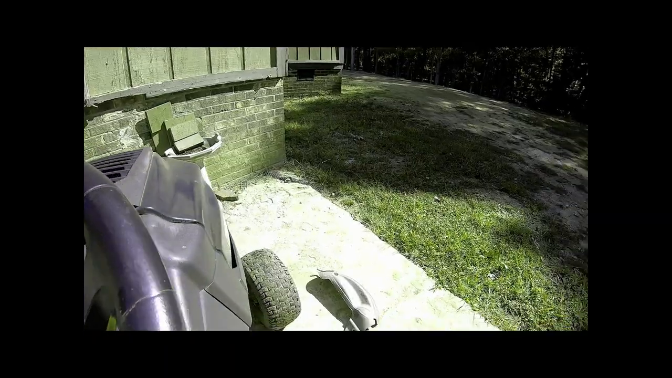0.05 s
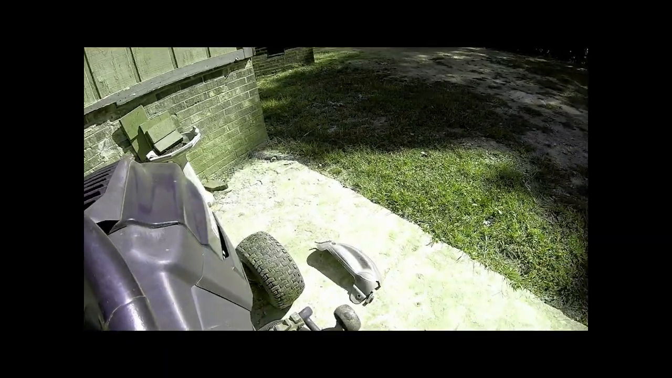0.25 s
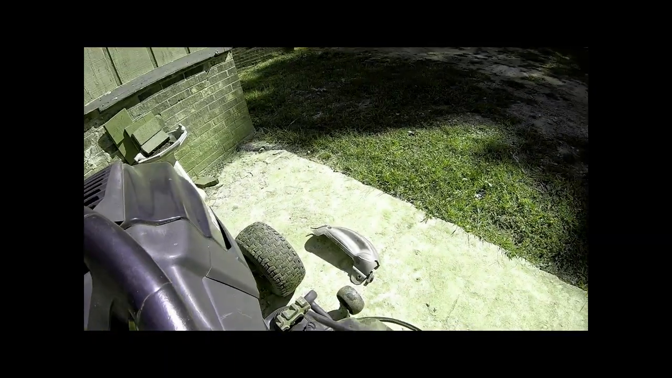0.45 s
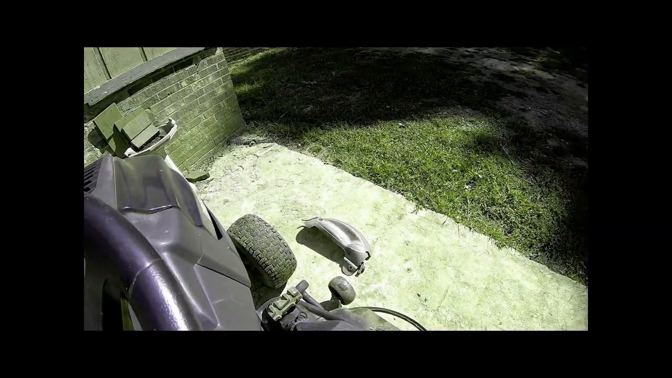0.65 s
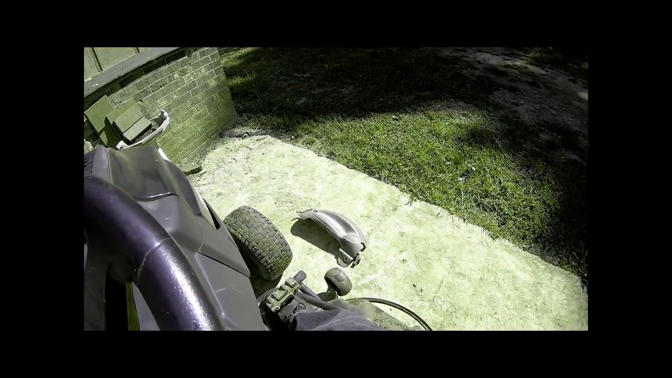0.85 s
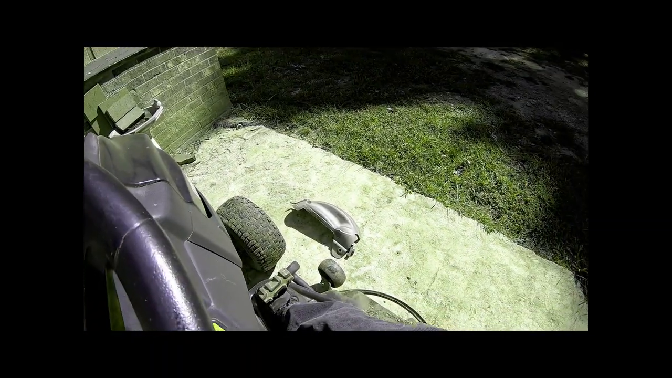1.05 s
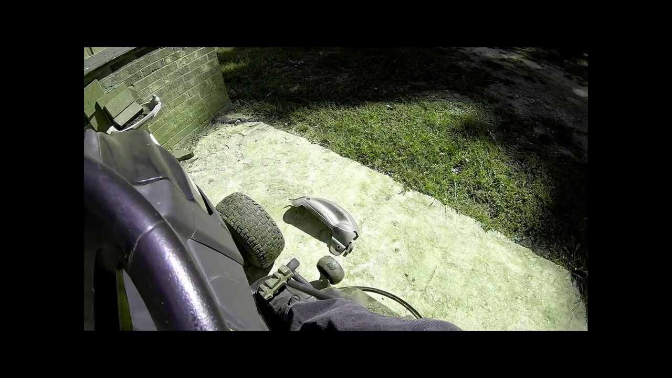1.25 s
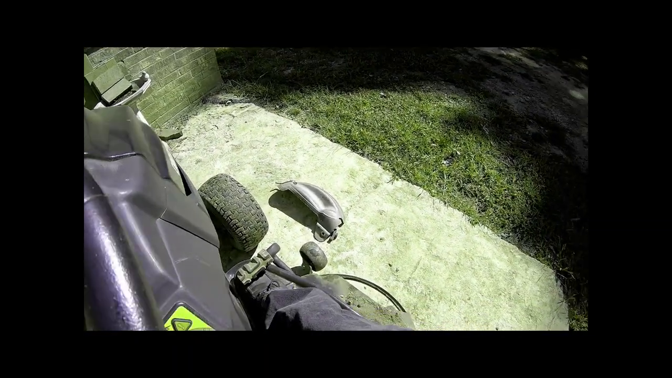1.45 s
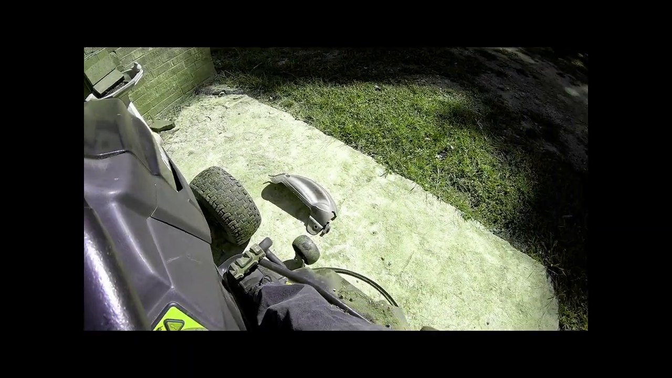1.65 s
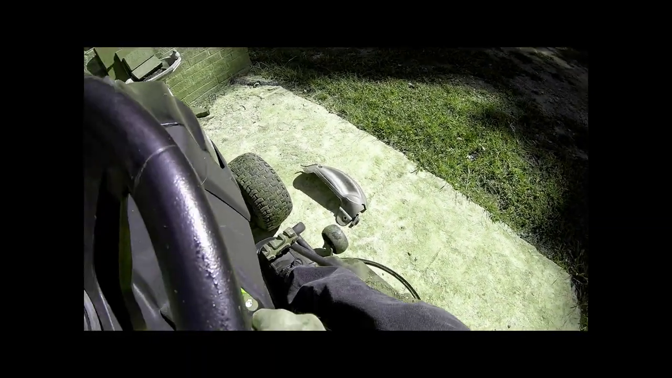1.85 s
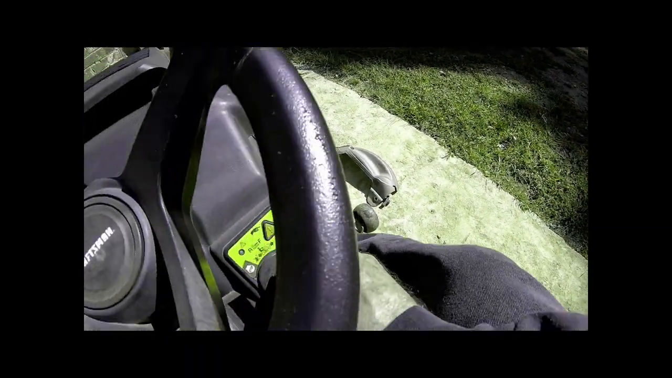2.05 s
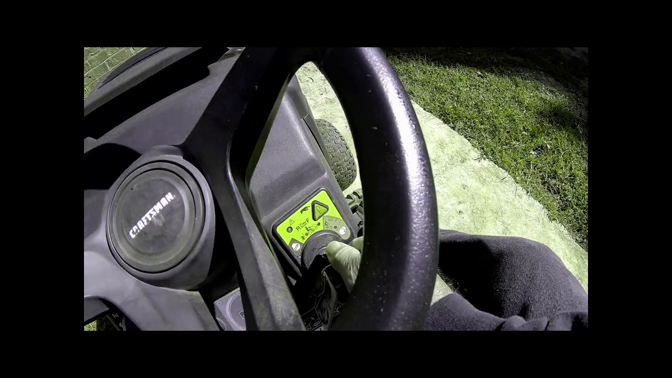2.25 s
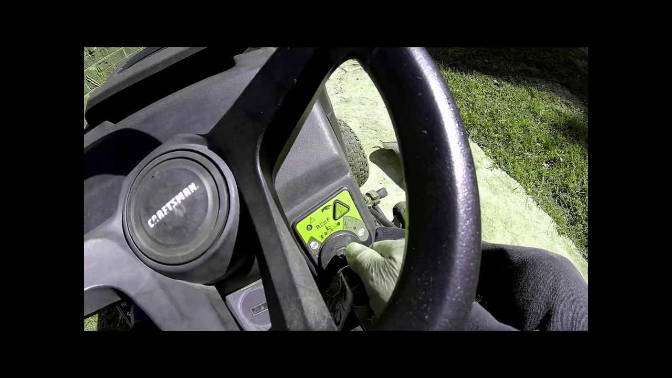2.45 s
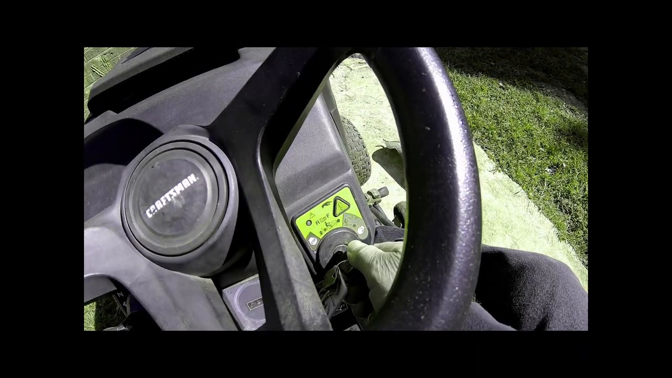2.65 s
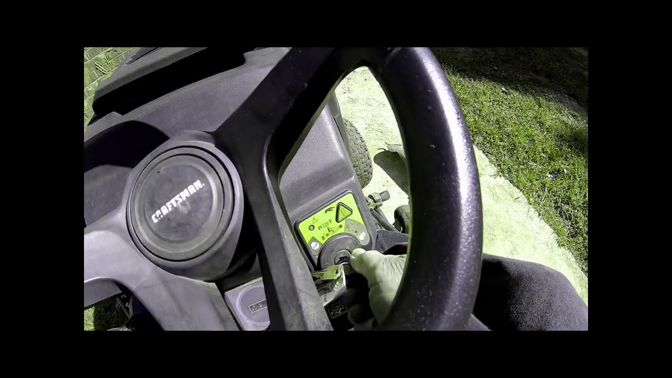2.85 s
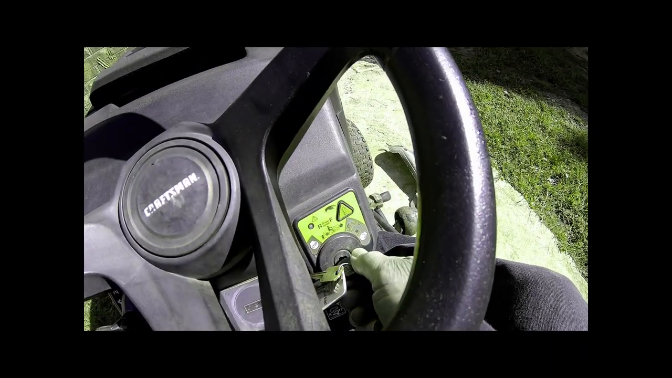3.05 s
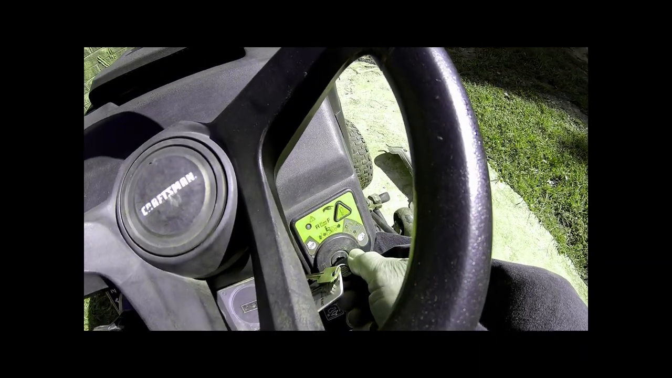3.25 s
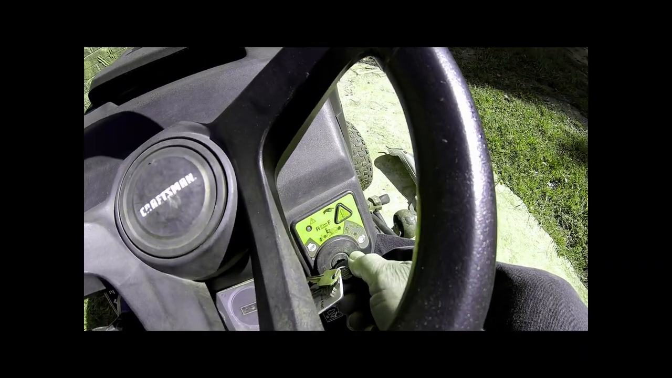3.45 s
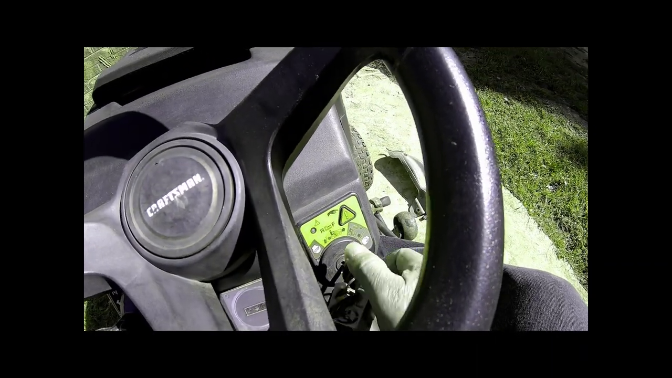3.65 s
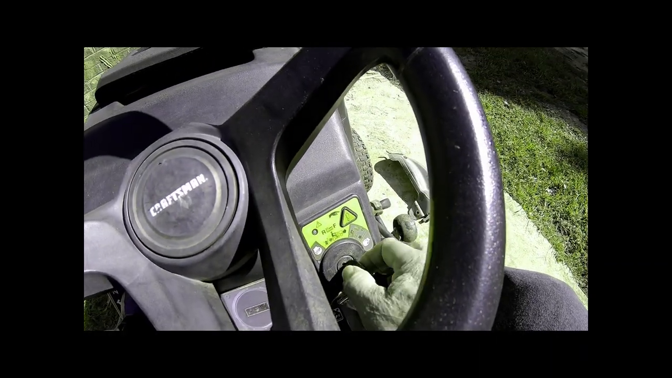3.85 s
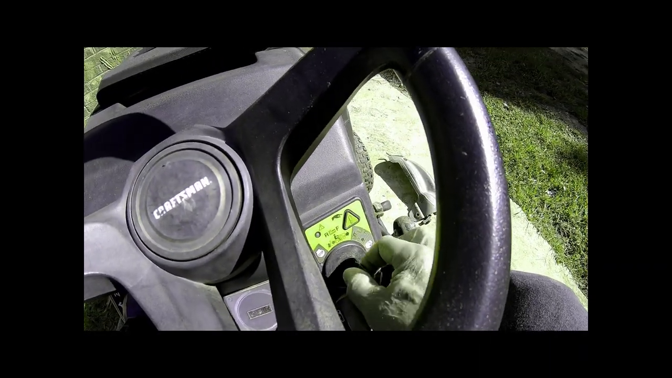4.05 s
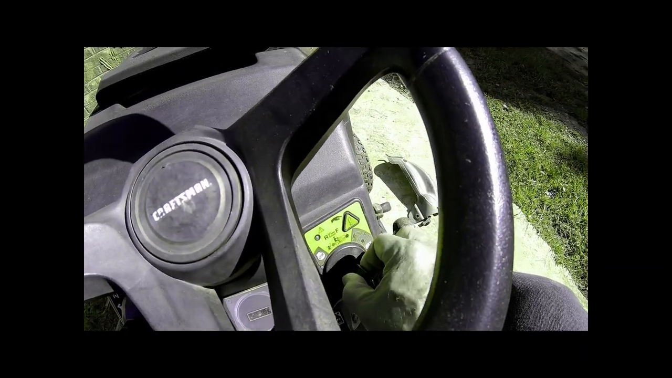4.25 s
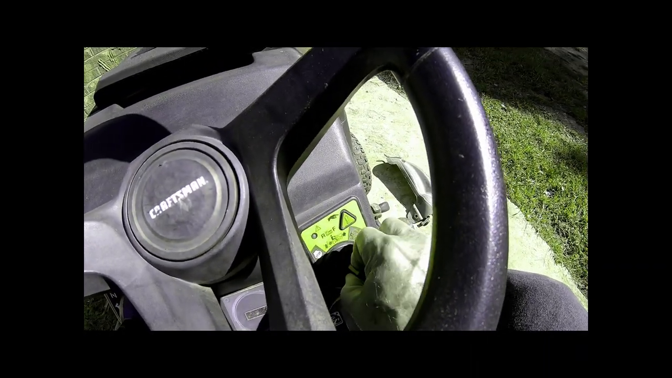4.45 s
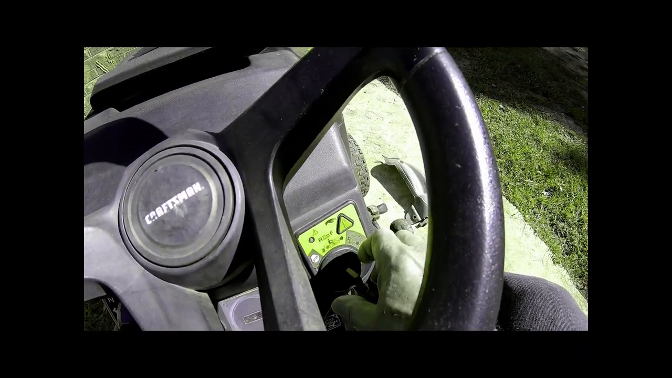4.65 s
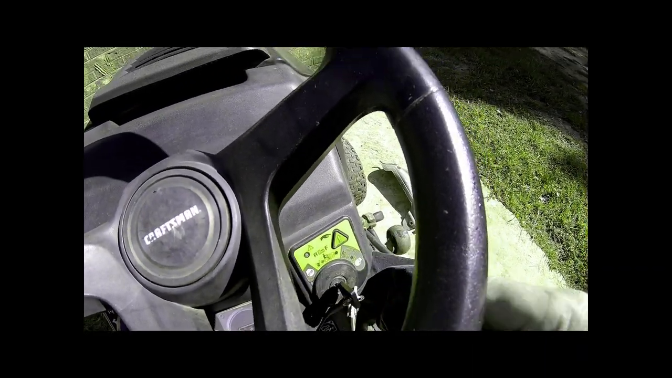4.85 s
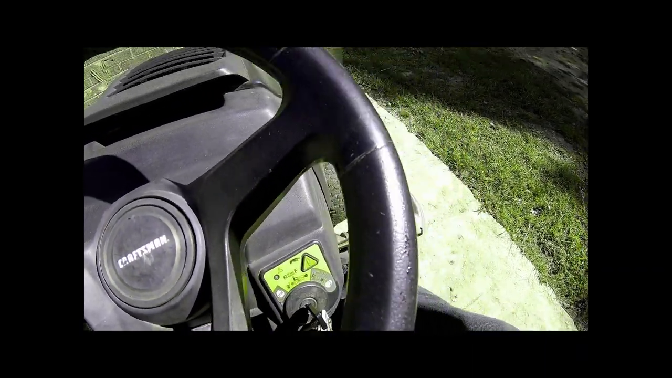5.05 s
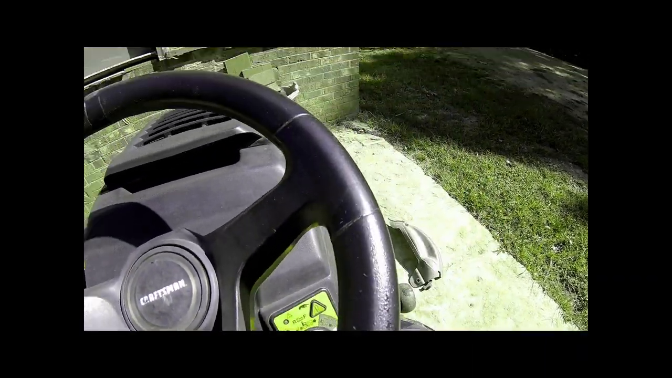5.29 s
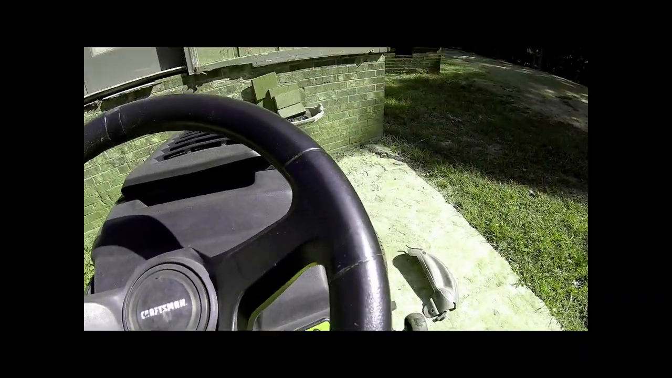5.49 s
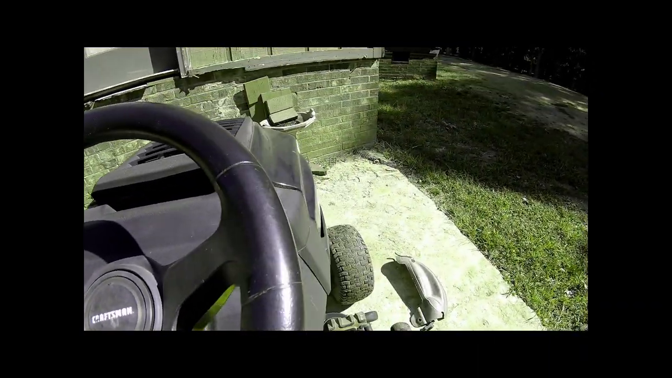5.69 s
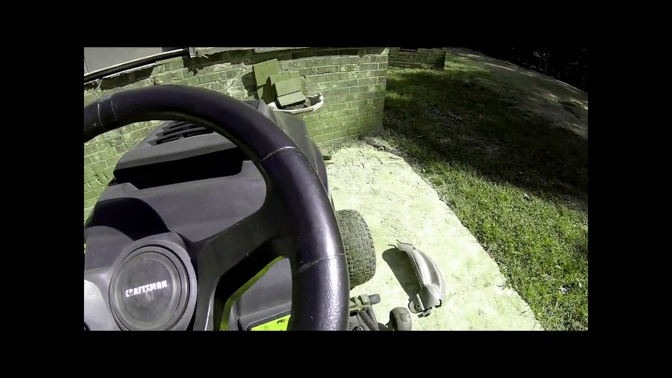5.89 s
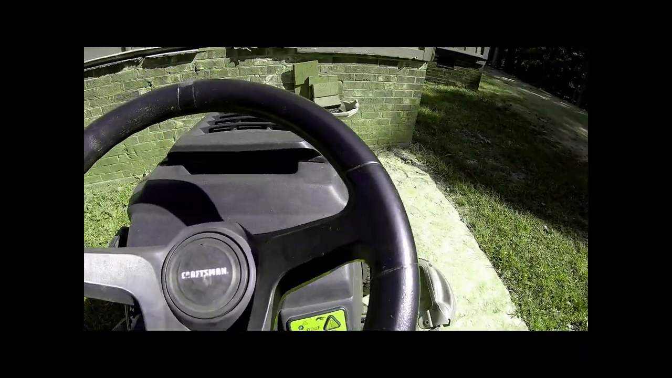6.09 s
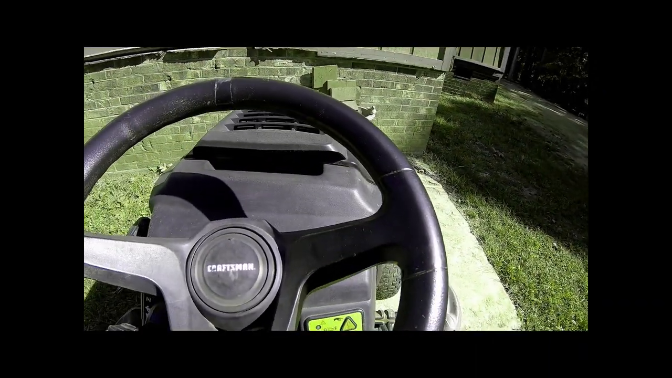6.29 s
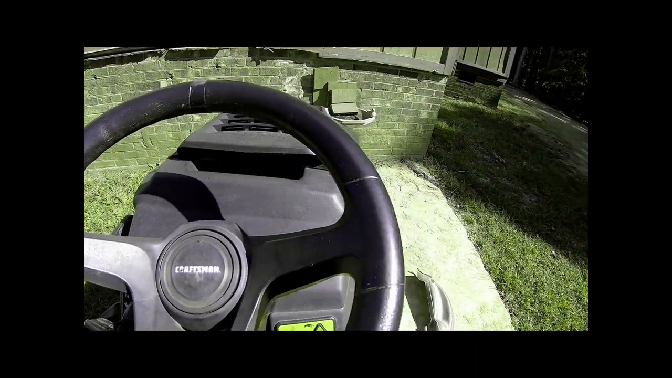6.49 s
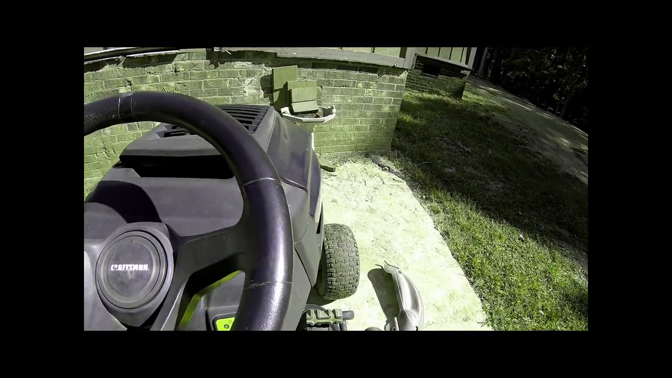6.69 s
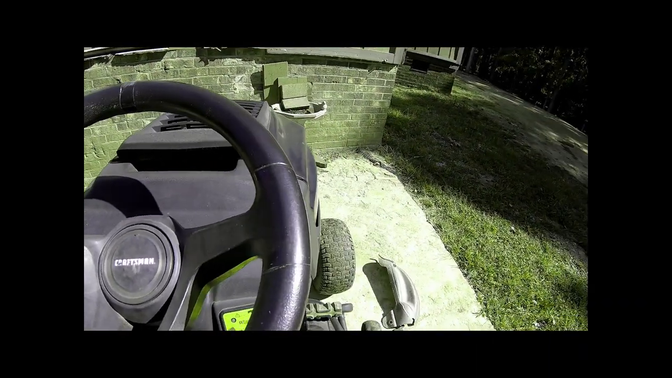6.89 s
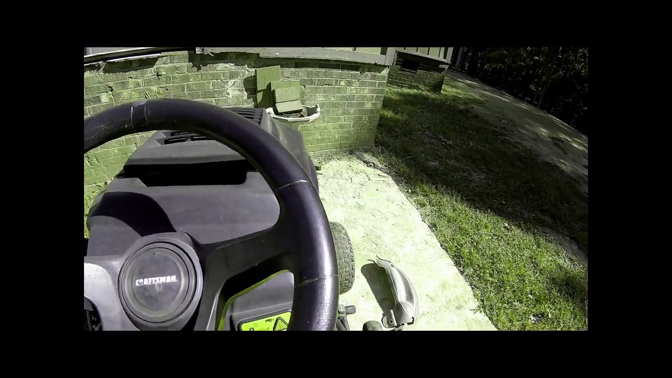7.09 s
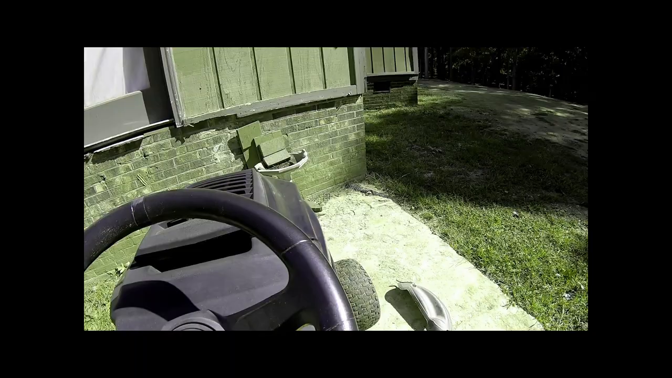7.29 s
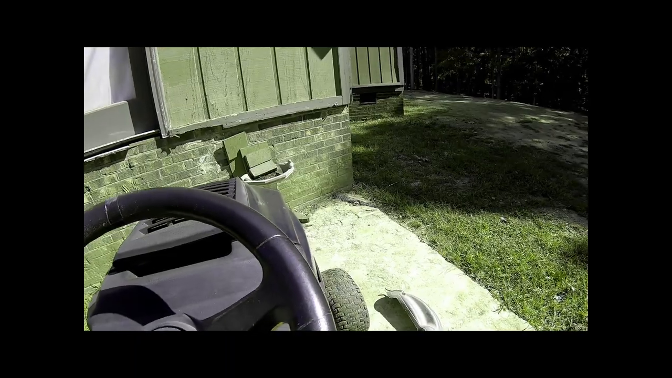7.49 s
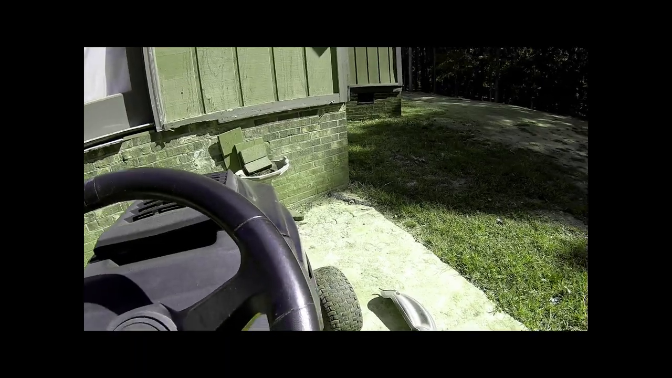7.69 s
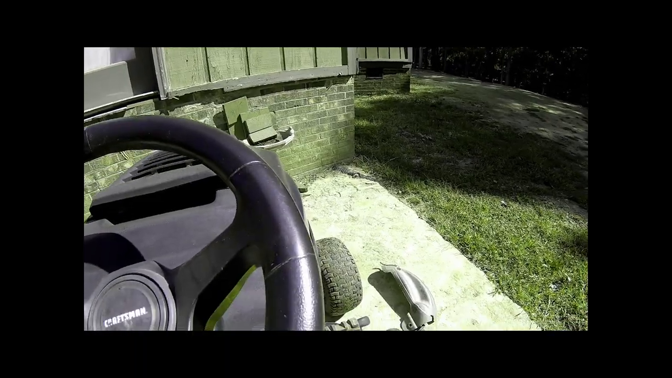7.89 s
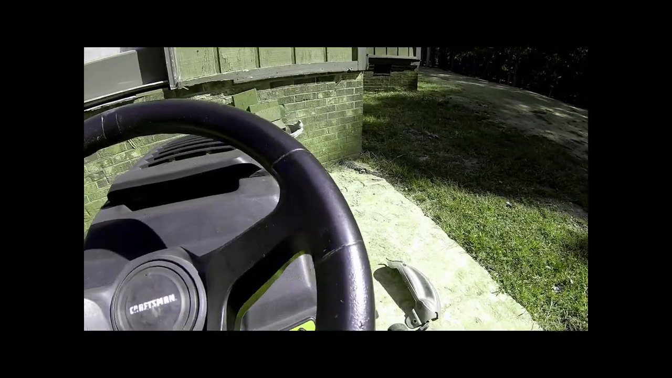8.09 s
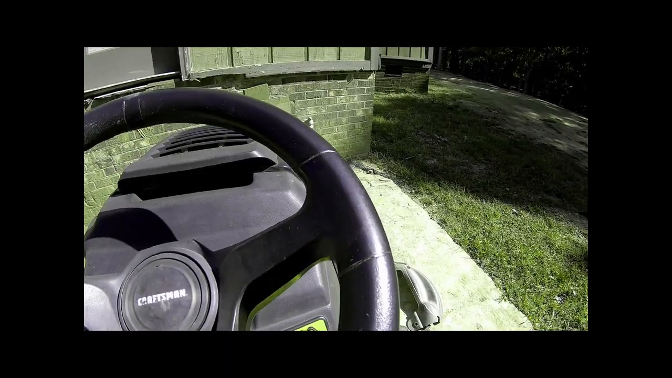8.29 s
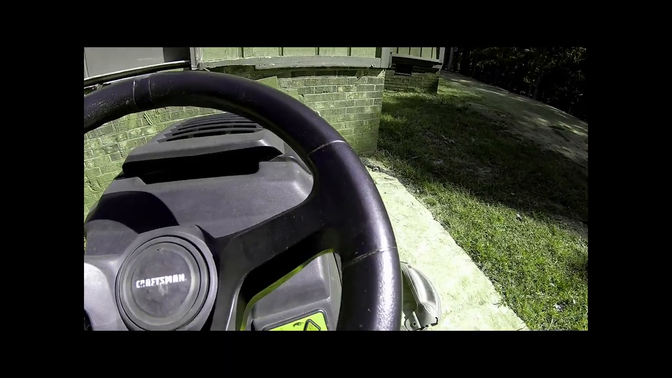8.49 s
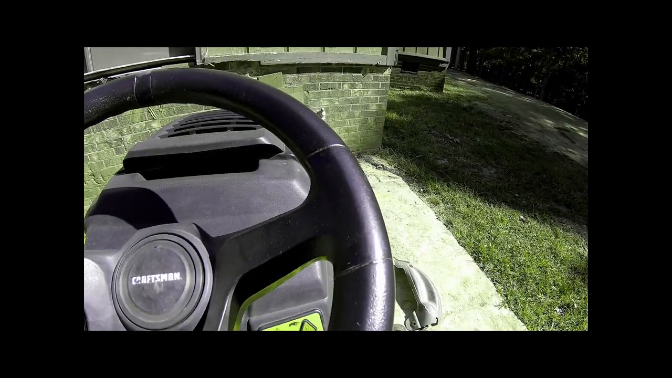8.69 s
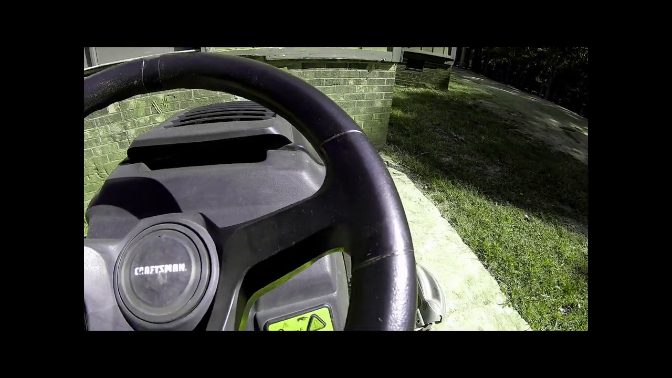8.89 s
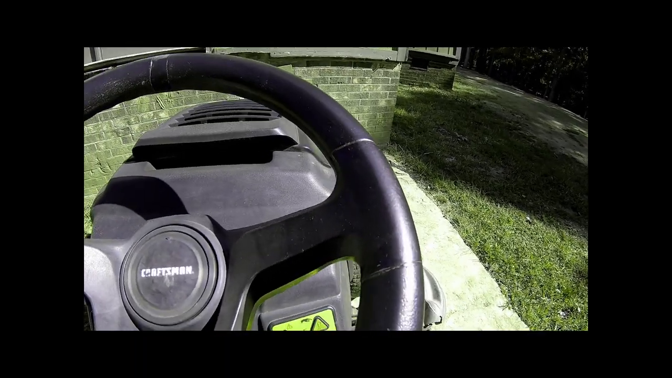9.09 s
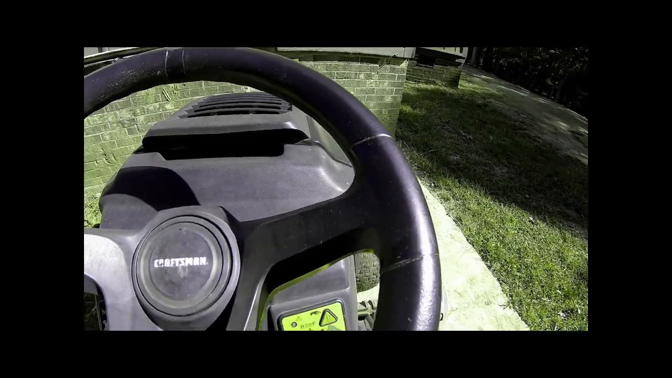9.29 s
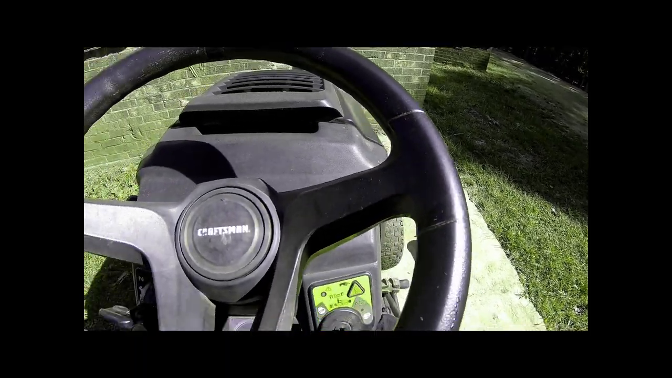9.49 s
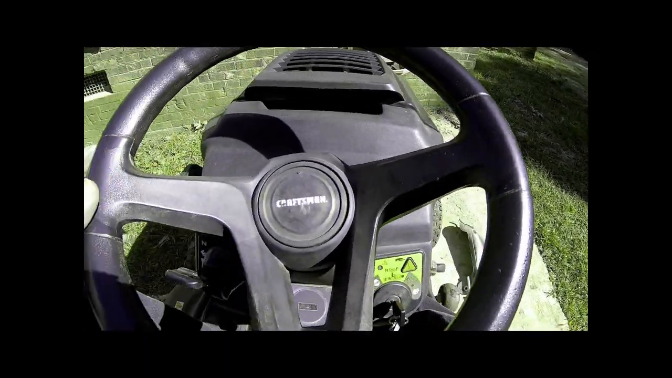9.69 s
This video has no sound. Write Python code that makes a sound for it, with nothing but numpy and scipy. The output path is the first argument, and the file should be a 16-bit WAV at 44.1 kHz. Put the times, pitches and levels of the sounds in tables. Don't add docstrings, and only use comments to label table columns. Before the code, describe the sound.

Close, muffled outdoor sound from a rider's position: low wind flutter, seat creaks, plastic knocks and faint key jingles, then a near-quiet pause. A short gritty starter grind follows with heavy clunks, then separate deep exhaust pops come faster and merge. The small engine races up and holds a loud, steady throbbing drone with fan rush, dipping slightly in pitch near the end.

```python
import sys
import numpy as np
from scipy import signal
from scipy.fft import rfft, irfft, next_fast_len
from scipy.io import wavfile
from scipy.ndimage import uniform_filter1d, map_coordinates

SR = 44100
rng = np.random.default_rng(int(sys.argv[2]) if len(sys.argv) > 2 else 0)


def waveform_to_disk(signal):
    frames = np.transpose(np.atleast_2d(signal))
    scaled = np.clip(frames, -1, 1) * 32767
    samples = np.round(scaled).astype(np.int16)
    wavfile.write(sys.argv[1], SR, samples)


def invert_db(x):
    u = np.asarray(x, float) / 20
    return 10 ** u


N = 429093
T = np.arange(N) / SR


def unit(x):
    return x / np.sqrt(np.mean(x ** 2) + 1e-20)


def curves(rows):
    s, *columns = np.transpose(rows)
    inside = 1. * (T > s[0]) * (T <= s[-1])
    on = uniform_filter1d(inside, size=300, mode="nearest")
    return [np.interp(T, s, column) for column in columns] + [on]


def wobble(rate):
    points = rng.standard_normal(int(N * rate / SR) + 4)
    return map_coordinates(points, [T * rate])


def hiss(points, tilt_db=0., peaks=()):
    m = next_fast_len(N)
    hz = np.fft.rfftfreq(m, 1 / SR) + 1
    f, db = np.transpose(points)
    shape_db = np.interp(np.log(hz), np.log(f), db) + tilt_db * np.log2(hz / 1000)
    for centre, width, top in peaks:
        shape_db = shape_db + top / (1 + (2 * (hz - centre) / width) ** 2)
    white = rfft(rng.standard_normal(m))
    return unit(irfft(white * invert_db(shape_db), m)[:N])


def burst(s, t60, rise):
    t = np.clip(T - s, 0, None)
    return invert_db(-60 * t / t60) * (1 - np.exp(-t / rise))


def ring(s, hz, t60, rise):
    return np.sin(2 * np.pi * hz * (T - s)) * burst(s, t60, rise)


def swells(rest_db, times, halves, peaks_db):
    humps = [invert_db(db) * np.exp(-((T - s) / half) ** 2) for s, half, db in zip(times, halves, peaks_db)]
    return invert_db(rest_db) + sum(humps)


def patchy(x, depth_db, wide, long):
    z = signal.stft(x, nperseg=512)[2]
    field = rng.standard_normal(z.shape)
    field = uniform_filter1d(field, size=wide, axis=0)
    field = uniform_filter1d(field, size=long, axis=1)
    return unit(signal.istft(z * invert_db(depth_db * unit(field)), nperseg=512)[1][:N])


# (multiple of the firing rate, level [dB])
EXHAUST_TONES = [(1, -24), (2, -12), (3, -19), (4, -20), (5, 0), (6, 0), (7, -7), (8, -4), (9, -17),
                 (10, -14), (11, -19), (12, -22), (13, -20), (14, -18), (15, -21), (16, -26), (17, -25),
                 (18, -33), (19, -37), (20, -39), (21, -41), (22, -39), (23, -41), (24, -31), (25, -32),
                 (26, -30), (27, -39), (28, -34), (29, -31), (30, -33)]
# (frequency [Hz], gain [dB])
MUFFLER_GAIN = [(137, -0.5), (163, -5), (174, -0.9), (217, 2.5), (234, -1), (255, 1.5), (270, 2.5),
                (290, -3.5)]
# (frequency [Hz], level [dB])
OPEN_BLAST = [(22, -37), (68, -25), (95, -26.5), (158, -19), (250, -29), (290, -33.5), (420, -35.5),
              (520, -60.5)]
GOVERNED_TURNOVERS = [6.5, 10.4]
OPEN_TURNOVERS = [1.5, 2.5, 3.5, 5.5, 10.5]


def exhaust(turns, rate, throttle, on):
    def turned(turnovers):
        return -sum(np.pi / 2 + np.arctan((np.arange(33) - k) / .12) for k in turnovers)

    def muffler_db(hz):
        return np.interp(hz, *np.transpose(MUFFLER_GAIN))

    throb_phase, blast_phase = turned(GOVERNED_TURNOVERS), turned(OPEN_TURNOVERS)
    rattle = 1.3 * rng.standard_normal(22)
    throb_phase[11:] += rattle
    blast_phase[11:] += rattle
    wide_open = np.clip((throttle - .5) / .1, 0, 1)
    out = np.zeros(N)
    for k, level in np.array(EXHAUST_TONES, float):
        k = int(k)
        slide_db = muffler_db(k * rate) - muffler_db(k * 28.43)
        swing = 2 * np.pi * k * turns + .012 * k * max(1, k / 12) * wobble(12)
        throb = invert_db(level - 17 + slide_db) * np.cos(swing + throb_phase[k])
        blast_db = np.interp(k * rate, *np.transpose(OPEN_BLAST))
        blast = invert_db(blast_db) * np.cos(swing - 2 * np.pi * k * 0.04 + blast_phase[k])
        out += invert_db(.1 * k ** .5 * wobble(4.7)) * ((1 - wide_open) * throb + wide_open * blast)
    return np.sqrt(2) * on * out


def firing_puffs(turns, rate):
    since = (turns % 1) / rate
    sizes = invert_db(1.5 * rng.standard_normal(400))
    size = sizes[np.floor(turns).astype(int)]
    return size * 1.2 * np.exp(-since / .013) * (1 - np.exp(-since / .006))


# (frequency [Hz], level [dB])
CASE = [(300, -36), (480, -1.5), (580, -19.5), (720, -7), (1200, -8.5), (1500, -12.5), (1900, -13.5),
        (3400, -28), (4800, -21.5), (7000, -44), (9000, -55), (10700, -63), (12100, -45.5), (15700, -52)]
# (frequency [Hz], width [Hz], lift [dB])
MUFFLER_MOUTH = [(1080, 300, 10), (2500, 1500, -4), (4450, 500, 5)]


def chuff(puff, throttle):
    chuff_db = -42.5 + 15 * np.clip(throttle / 0.69, 0, 1)
    return invert_db(chuff_db + 2 * wobble(350)) * puff * hiss(CASE, tilt_db=5., peaks=MUFFLER_MOUTH)


# (frequency [Hz], level [dB])
SHELL = [(53, -55), (90, -18), (134, -4), (247, 0), (361, -3), (396, -1.5), (437, -9.5), (650, -30.5),
         (840, -61.5), (1430, -120)]
# (frequency [Hz], level [dB])
BUFFET = [(8.8, -31.5), (15, -8), (40, -2), (108, -18), (160, -17), (210, -51.5), (350, -120)]


def rumble(turns, throttle, on):
    rumble_db = -32.5 + 11 * throttle + 1.5 * wobble(2.2) + .7 * wobble(9)
    shaking = invert_db(rumble_db) * hiss(SHELL, tilt_db=-1.)
    shaking *= 1 + .55 * on * np.cos(2 * np.pi * (turns - .1))
    return shaking + invert_db(-43.5 + 2.5 * wobble(16)) * hiss(BUFFET, tilt_db=5.0)


# (frequency [Hz], width [Hz], lift [dB])
HOOD = [(723, 19, 4), (886, 26, 0), (954, 91, 6), (1178, 69, 4), (1865, 140, 5.5), (2330, 66, 5.5)]


def fan_rush(puff, throttle, on):
    caught = np.clip((T - 3.796) / 0.27, 0, 1)
    rush_db = -35.5 - 5.5 * (1 - caught) + 1.2 * throttle + 0.59 * wobble(6.7)
    running_fan = patchy(hiss(CASE, tilt_db=0.06, peaks=HOOD), 1.3, wide=3, long=120)
    coasting_fan = hiss(CASE, tilt_db=-1.95, peaks=HOOD)
    fan = caught * running_fan + (1 - caught) * coasting_fan
    return invert_db(rush_db) * (1 + 0.17 * on * puff) * fan


# (time [s], firing rate [firings/s])
SPEED = [(4.06, 17.5), (4.12, 19), (4.22, 20.9), (4.31, 22.5), (4.42, 23.6), (4.58, 25.1), (4.68, 27.2),
         (4.74, 28.7), (4.8, 29.2), (5.02, 28.95), (5.49, 28.6), (6.32, 28.3), (7.89, 28.28), (8.4, 27.98),
         (8.79, 27.17), (9.13, 27.1), (9.43, 27.7), (9.73, 27.6)]
# (time [s], opening [0-1])
THROTTLE = [
    (3.2, 0),
    (3.82, 0.22),
    (4.06, .62),
    (4.16, 0.72),
    (4.51, 0.58),
    (4.67, .56),
    (4.78, 0),
    (5.5, 0.13),
    (9.73, 0.01),
]


def engine():
    rate, on = curves(SPEED)
    turns = np.cumsum(rate) / SR
    turns -= np.interp(4.331, T, turns)
    throttle, running = curves(THROTTLE)
    puff = firing_puffs(turns, rate)
    shell_and_fan = rumble(turns, throttle, on) + fan_rush(puff, throttle, on)
    return exhaust(turns, rate, throttle, on) + running * shell_and_fan + on * chuff(puff, throttle)


# (time [s], peak level [dB], crack level [dB], muffler tone [Hz])
POPS = [
    (3.165, -2.5, -40.5, 175),
    (3.298, -7, -74, 162),
    (3.452, -5, -55.5, 165.5),
    (3.611, -1.5, -42.5, 177),
    (3.741, -2, -34, 186),
    (3.847, -3, -40, 191),
    (3.94, -4.5, -39, 205),
    (4.021, -2.5, -38, 135),
]
# (time [s], peak level [dB])
GULPS = [(2.899, -17), (3.078, -20), (3.246, -14.5), (3.397, -16.5), (3.554, -15), (3.697, -15),
         (3.81, -14), (3.91, -15.5), (3.991, -11)]


def first_firings():
    out = np.zeros(N)
    spit = hiss(CASE, tilt_db=4.5, peaks=MUFFLER_MOUTH)
    for s, db, crack_db, hz in POPS:
        blast = ring(s - .004, 139.7, 0.018, 0.0019)
        suck_back = 0.78 * ring(s, 55, 0.064, 0.0026)
        muffler = 1.22 * ring(s + 0.0081, hz, 0.068, 0.0041)
        out += invert_db(db) * (blast - suck_back + muffler)
        out += invert_db(crack_db + 12.5) * burst(s + .001, .09, .006) * spit
    for s, db in GULPS:
        out += invert_db(db + 6.5) * (ring(s, 121, 0.062, 0.0046) + 0.31 * ring(s, 90, 0.095, 0.0011))
    return out


# (time [s], tooth rate [Hz], level [dB])
STARTER = [(2.63, 243.7, -41.5), (2.668, 258, -11), (2.7, 269.8, -12), (2.76, 414.2, -13), (2.9, 259, -18),
           (2.942, 256.7, -26), (3.11, 295.3, -20.5), (3.148, 259.8, -14), (3.24, 245.6, -32)]
# (frequency [Hz], width [Hz], lift [dB])
GEARBOX = [(738, 60, 5), (960, 110, 9), (1180, 110, 7), (1800, 110, 8), (3970, 100, 4), (5300, 1200, 3)]
# (time [s], half length [s], level change [dB])
STALLS = [
    (2.806, .025, -10.5),
    (3.046, .012, -8.5),
]
# (time [s], level [dB], tone [Hz], rise [s])
CLUNKS = [
    (2.636, -19, 225, .002),
    (2.657, -4.5, 211, 0.0032),
    (2.676, -2.5, 260, 0.0023),
    (3.133, -11, 262, 0.0044),
    (4.045, 2, 238, 0.014),
]


def starter():
    tooth_hz, mesh_db, on = curves(STARTER)
    bite_s, let_go_s = 2.662, 3.15
    rise_db = 305 * np.clip(bite_s - T, 0, 1)
    coast_db = 234 * np.clip(T - let_go_s, 0, 1)
    grind_db = -27 - rise_db - coast_db
    for s, half, db in [(bite_s, 0.014, 7), *STALLS]:
        grind_db += db * np.exp(-((T - s) / half) ** 2)
    teeth = 2 * np.pi * np.cumsum(tooth_hz) / SR + .8 * wobble(70)
    whine = np.sin(teeth) + 0.16 * np.sin(2 * teeth) + 0.16 * np.sin(3 * teeth)
    whine = invert_db(2.2 * wobble(60)) * whine
    mesh = .7 * unit(whine) + .65 * hiss(SHELL, tilt_db=.1)
    scrape = patchy(hiss(CASE, tilt_db=3.0, peaks=GEARBOX), 1.5, wide=4, long=14)
    grind = unit((1 + 0.27 * np.cos(teeth)) * invert_db(1.8 * wobble(45)) * scrape)
    blows = sum(invert_db(db) * ring(s, hz, 0.1, rise) for s, db, hz, rise in CLUNKS)
    return on * (invert_db(mesh_db) * mesh + invert_db(grind_db) * grind) + blows


# (time [s], peak level [dB], thud level [dB], thud tone [Hz])
KNOCKS = [(.012, -30.5, -35, 179), (.086, -28, -33, 179), (.143, -34, -45, 180), (.325, -38.5, -62, 229),
          (.36, -38, -40, 177), (.573, -48, -49, 183), (.626, -40, -52, 183), (.679, -44.5, -35, 243),
          (.712, -45, -43, 232), (.798, -46, -49, 210), (0.827, -42, -47, 223), (0.89, -34, -54, 302),
          (.942, -26.5, -28.5, 327), (0.96, -41.5, -29.5, 222), (1.044, -40, -44, 200),
          (1.074, -35.5, -39, 247), (1.094, -25, -35, 235), (1.174, -28, -37.5, 405),
          (1.189, -35.5, -42, 256), (1.295, -60, -35, 203), (2.007, -33, -58, 211), (2.061, -50, -59, 205)]
# (frequency [Hz], width [Hz], lift [dB])
PEDAL = [(1360, 160, 6), (1800, 160, 7), (2860, 110, 9), (3730, 540, 11.5)]
# (frequency [Hz], level [dB], time to fall 60 dB [s])
SPRING = [(1300, -14, .05), (2250, -50, 1.8), (3300, -51, 2.1), (3650, -52, 2.1), (4100, -38, .3)]
SOFT = [*CASE[:12], (15700, -85)]


def knocks():
    bright = hiss(CASE, tilt_db=5.0, peaks=PEDAL)
    dull = hiss(SOFT, tilt_db=1.0, peaks=PEDAL)
    out = np.zeros(N)
    for s, db, thud_db, hz in KNOCKS:
        t60 = .031 + .0011 * (db + 40)
        taps = burst(s - .001, t60, 0.0018) + 0.29 * burst(s + .004, t60, 0.0048)
        surface = bright if thud_db - db < -13 else dull
        out += invert_db(db - 5.0) * taps * surface
        out += invert_db(thud_db + 9.5) * ring(s, hz, 0.049, 0.0014)
        for f, level, ringing in SPRING:
            note_db = db + level + rng.normal(0, 1.37)
            out += invert_db(note_db) * ring(s, f * rng.normal(1, 0.0088), ringing, 0.0029)
    return out


# (time [s], peak level [dB])
JINGLES = [(0.8066, -48), (0.839, -50), (0.8989, -44), (0.9752, -53.5), (1.0997, -47), (1.1752, -48),
           (1.2391, -51.5), (3.513, -45.5), (3.5264, -40.5), (3.5394, -43), (3.5694, -69)]
# (frequency [Hz], level [dB], time to fall 60 dB [s])
KEY_NOTES = [(8650, -14, .06), (10900, -10, .06), (12250, -3, .1), (15100, -4, .07)]


def keys():
    tick = hiss(CASE, tilt_db=12.0)
    out = np.zeros(N)
    for s, db in JINGLES:
        out += invert_db(db - 3) * burst(s - .002, .055, .003) * tick
        for hz, level, t60 in KEY_NOTES:
            note_db = db + level + rng.normal(-17, 5)
            out += invert_db(note_db) * ring(s, hz * rng.normal(1, .008), t60, .0004)
    return out


# (time [s], half length [s], seat creak level [dB], cloth and sole level [dB])
MOVES = [(.05, 0.079, -43.5, -44.5), (0.192, 0.046, -60, -52), (0.385, 0.051, -48.5, -57.5),
         (0.666, 0.092, -42.5, -67.5), (0.89, 0.11, -45.5, -64.5), (0.974, 0.016, -30.5, -61),
         (1.02, .05, -49, -63), (1.097, .04, -42, -54), (1.192, 0.037, -44.5, -62),
         (1.285, 0.057, -47, -71), (1.533, 0.054, -56, -64.5), (1.765, 0.19, -72, -80),
         (1.951, 0.03, -61, -59), (2.035, 0.069, -56, -71), (2.328, 0.12, -61, -70),
         (2.628, 0.03, -54, -57)]
# (frequency [Hz], level [dB])
SEAT = [(65, -53), (110, -47.5), (132, -4), (221, 3.5), (306, -11), (413, -9.5), (700, -28), (910, -61),
        (1540, -120)]
# (frequency [Hz], width [Hz], lift [dB])
SOLE = [(1850, 300, 11), (3900, 500, 10), (5800, 200, 5)]


def shuffling():
    times, halves, creak_db, cloth_db = np.transpose(MOVES)
    creak = unit(invert_db(3.9 * wobble(30.6)) * hiss(SEAT))
    roughness_db = 2.1 * wobble(70) + 2.2 * wobble(400)
    cloth = unit(invert_db(roughness_db) * hiss(SOFT, tilt_db=0.4, peaks=SOLE))
    return swells(-61.5, times, halves, creak_db) * creak + swells(-78, times, halves, cloth_db) * cloth


# (time [s], half length [s], peak level [dB])
GUSTS = [(.07, 0.085, -34), (0.227, .02, -33), (0.41, 0.045, -46), (.7, 0.16, -62), (.97, 0.081, -47),
         (1.13, .02, -48), (1.36, 0.11, -48), (1.6, .06, -47.5), (1.796, 0.13, -47), (2.04, .02, -47),
         (2.154, .07, -38.5), (2.447, 0.12, -48)]


def wind():
    flutter = unit(invert_db(5.5 * wobble(13)) * hiss(BUFFET))
    return swells(-62.5, *np.transpose(GUSTS)) * flutter


# (frequency [Hz], level [dB])
AIR = [(300, -24), (1000, -0.5), (4000, -9), (6500, -15), (9000, -20), (10700, -31.5), (12300, -21),
       (13300, -34), (15700, -45)]
# (frequency [Hz], width [Hz], lift [dB])
THIN_TONES = [(3300, 60, 9), (3650, 60, 11), (5750, 80, 8), (6500, 80, 9)]


def garden():
    return invert_db(-76.0 + 2.2 * wobble(6.4)) * hiss(AIR, peaks=THIN_TONES)


def scene():
    machine = engine() + first_firings() + starter()
    person = knocks() + keys() + shuffling()
    return (machine + person + wind() + garden())[None]


def band_limit(x):
    return signal.sosfilt(signal.butter(12, 15830, fs=SR, output="sos"), x)


def record(dry):
    held = dry / (1 + np.abs(dry / .85) ** 6) ** (1 / 6)
    return band_limit(held)


dry = scene()
out = record(dry)
waveform_to_disk(out)
```